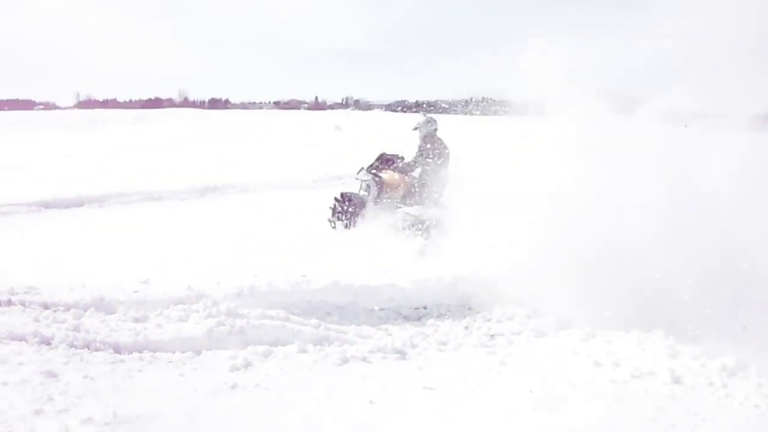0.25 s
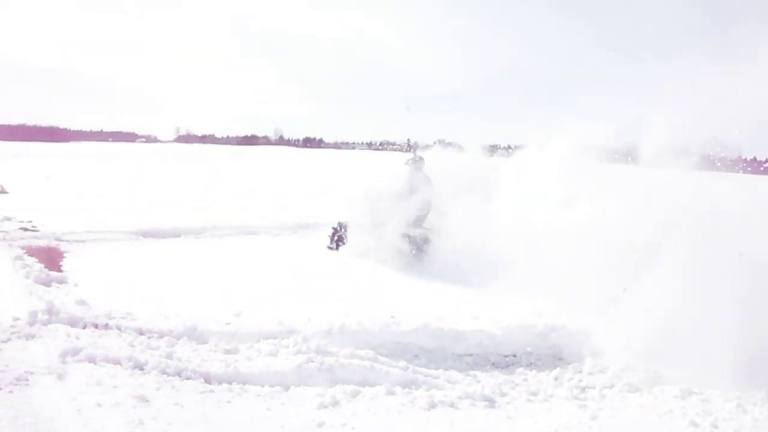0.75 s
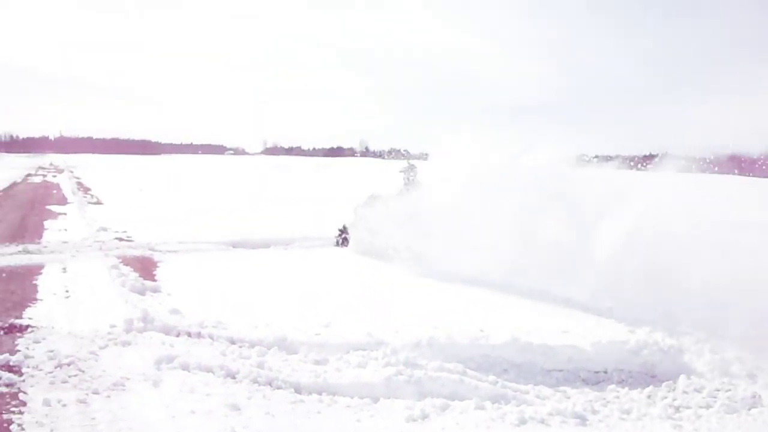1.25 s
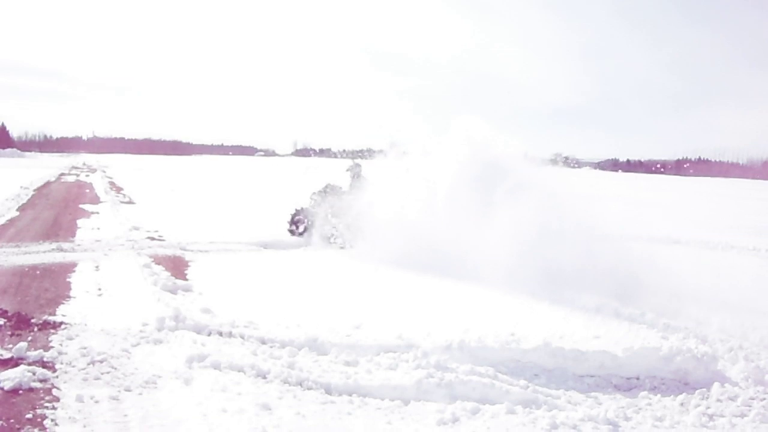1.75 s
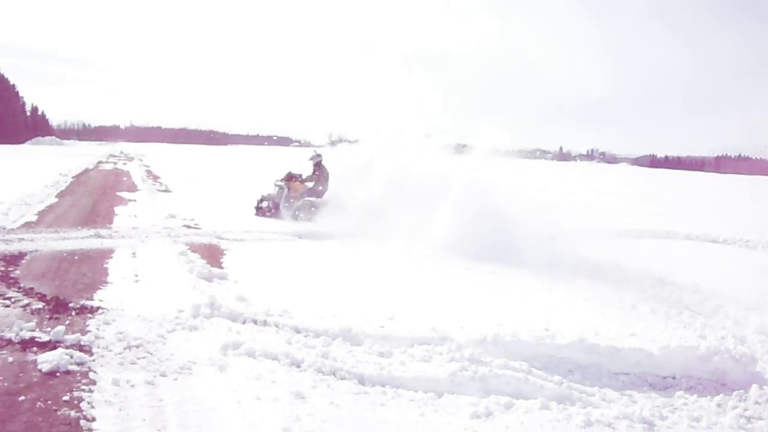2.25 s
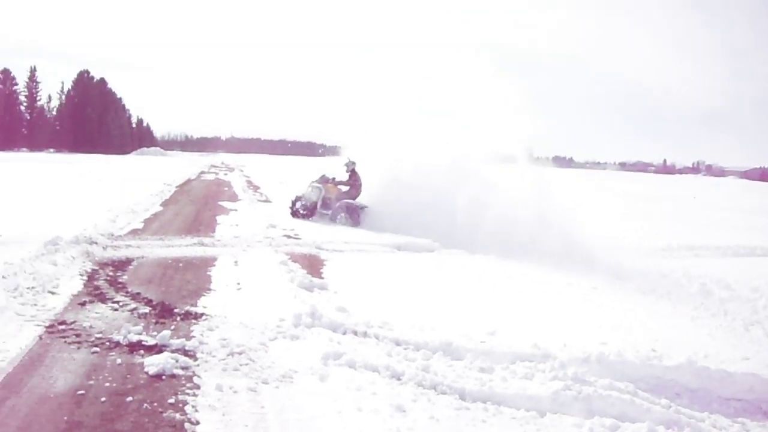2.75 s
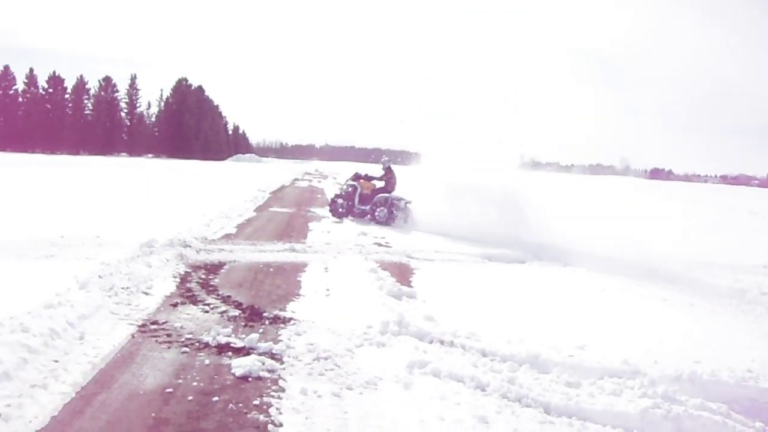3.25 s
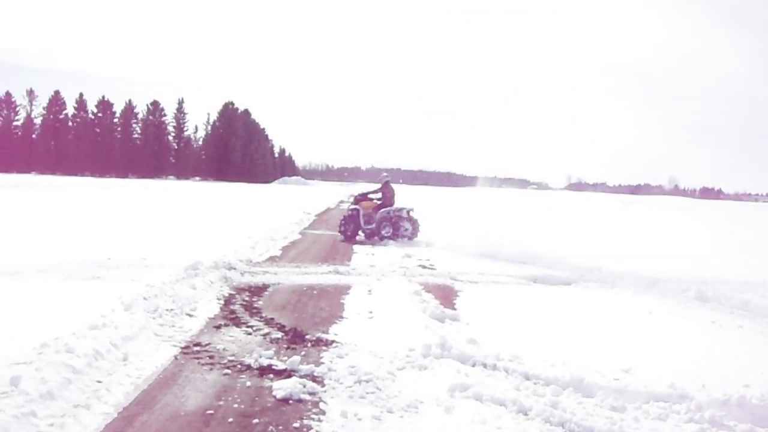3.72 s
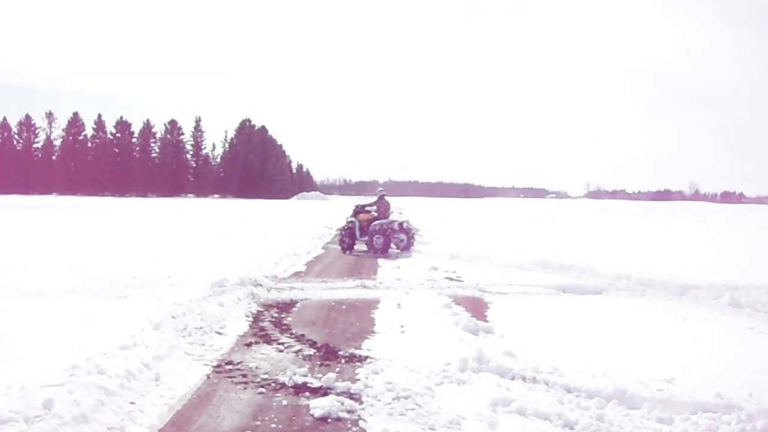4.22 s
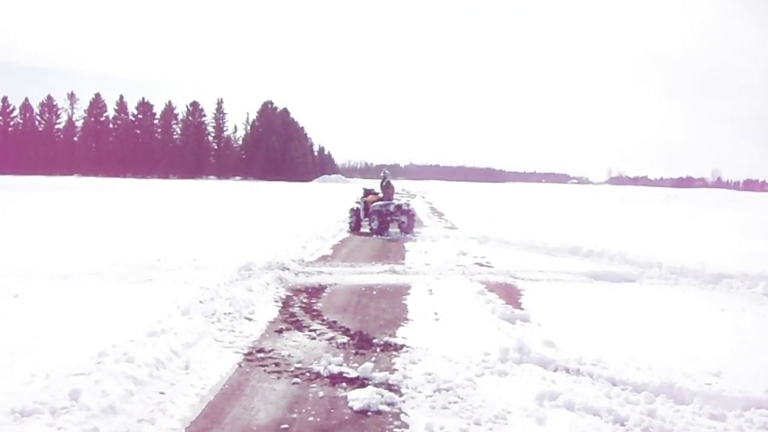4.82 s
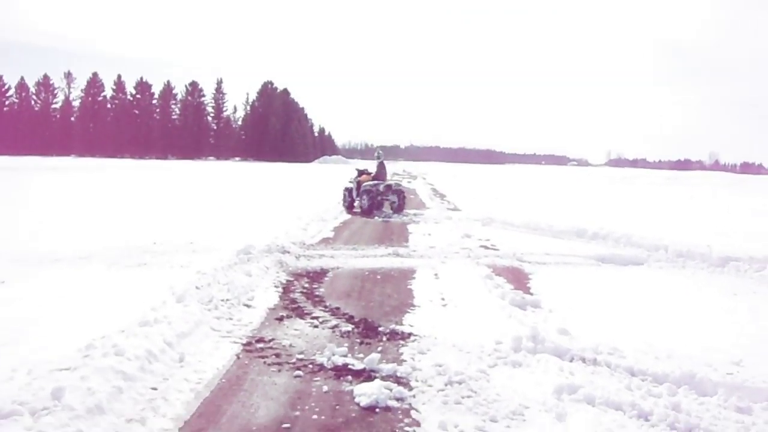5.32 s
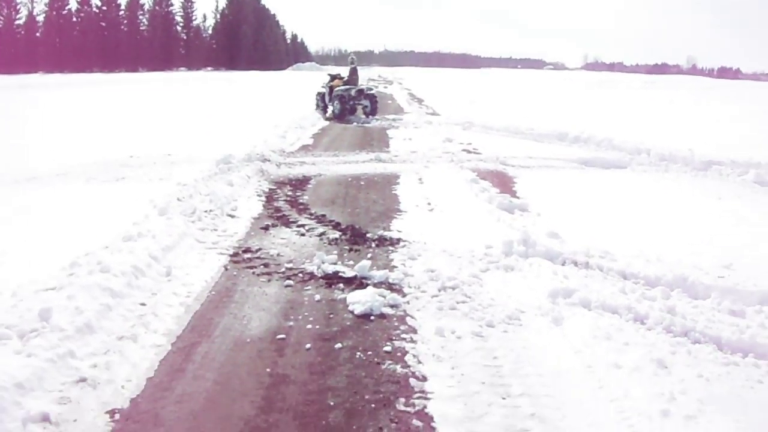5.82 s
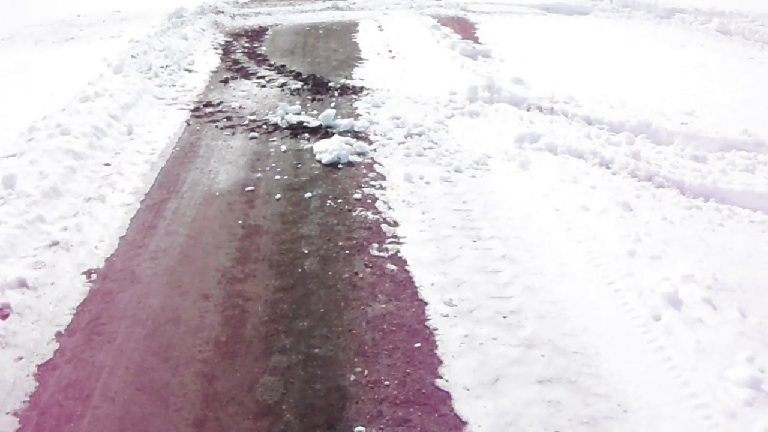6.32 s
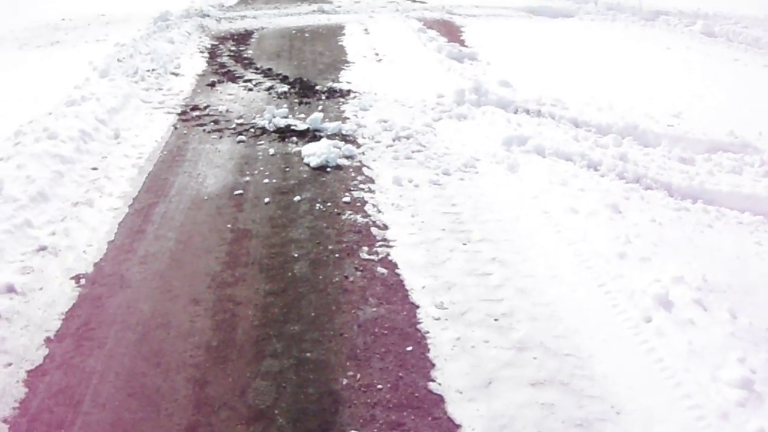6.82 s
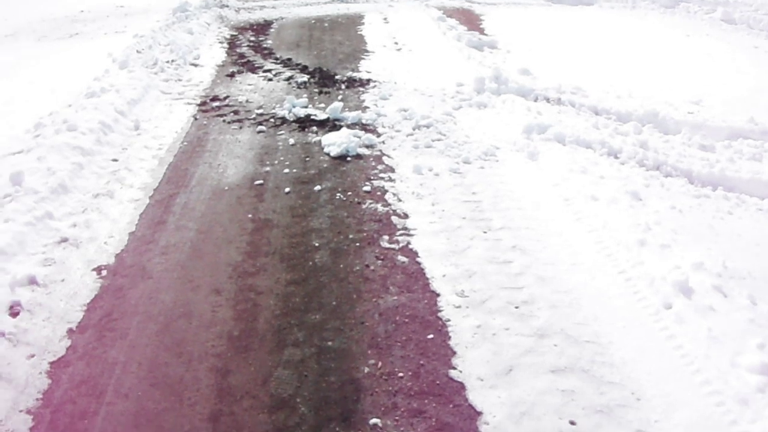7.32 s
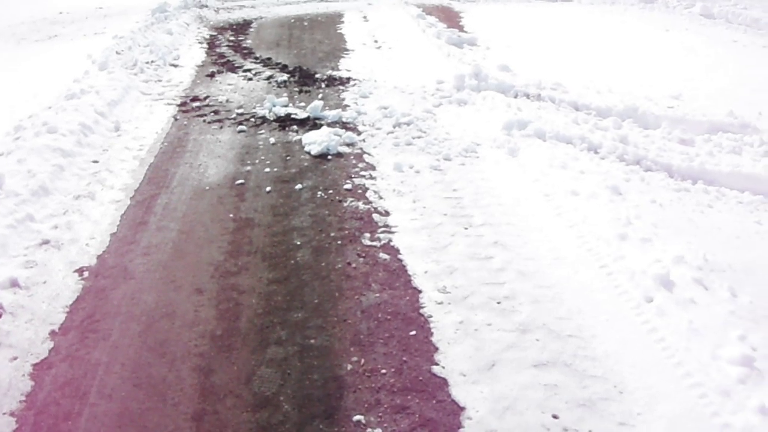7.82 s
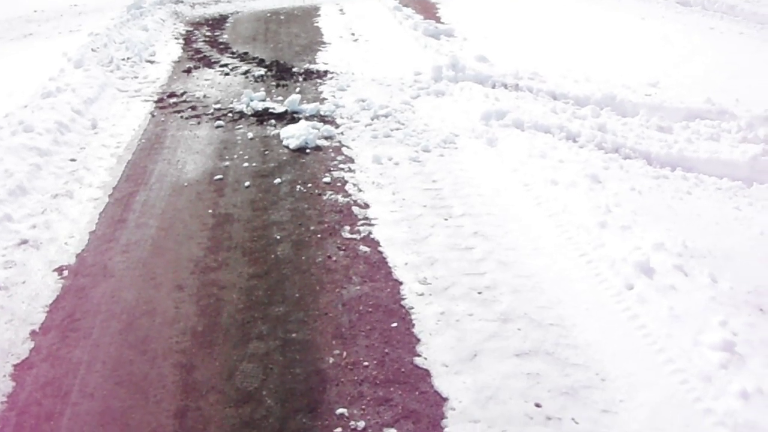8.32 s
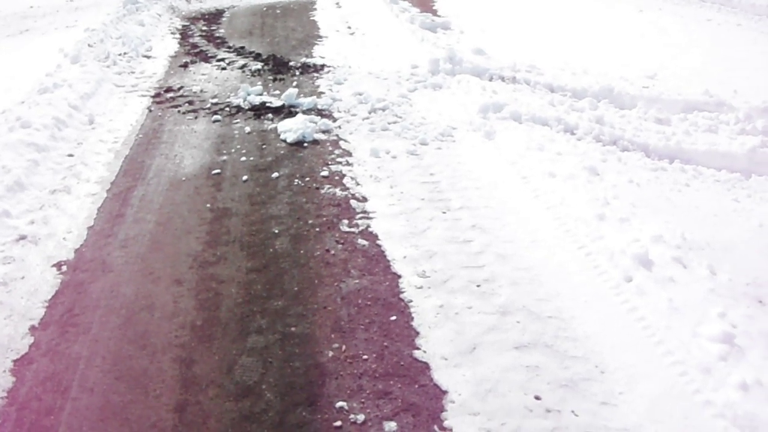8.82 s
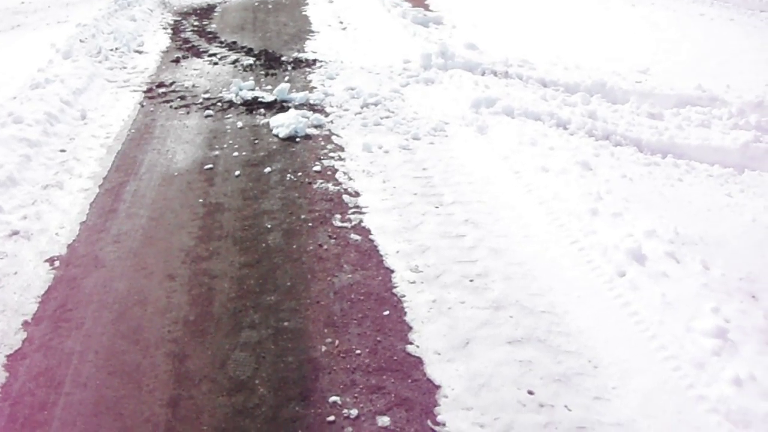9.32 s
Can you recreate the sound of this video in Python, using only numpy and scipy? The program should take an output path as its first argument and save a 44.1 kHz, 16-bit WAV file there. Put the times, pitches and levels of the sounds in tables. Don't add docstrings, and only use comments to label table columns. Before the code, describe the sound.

A quad's hard, buzzing full-throttle howl over snow spray lasts under three seconds, then collapses into a smooth run-down hum and separate thumping exhaust beats. Short throttle pulls bark out, followed by uneven idling and dry mechanical clatter. Handheld camera noises intrude very close: fabric scrapes, sharp plastic ticks, a tiny squeak and two booming blows. The idle returns clearly, then jumps up in a hard rev and a last jab. Open air, no reverberation.

```python
import sys
import numpy as np
from scipy import signal
from scipy.io import wavfile
from scipy.ndimage import uniform_filter1d

SR = 44100
rng = np.random.default_rng(int(sys.argv[2]) if len(sys.argv) > 2 else 0)


def voltage_ratio(decibels):
    exponent = np.asarray(decibels, float) / 20
    return 10 ** exponent


def dump_mix(stems):
    frames = np.atleast_2d(stems).T
    limited = np.clip(frames, -1, 1)
    pcm = np.round(limited * 32767).astype(np.int16)
    wavfile.write(sys.argv[1], SR, pcm)


N = 421591
TIME = np.arange(N) / SR


def evened(x):
    return x / np.sqrt(np.mean(x ** 2) + 1e-20)


def curves(rows, t):
    s, *columns = np.transpose(rows)
    return [np.interp(t, s, c) for c in columns]


def colour(x, points, size=2048):
    f, level_db = np.transpose(points)
    log_hz = np.log(abs(np.fft.fftfreq(size, 1 / SR)) + 1)
    log_gain = np.interp(log_hz, np.log(f), level_db) * np.log(10) / 20
    taps = np.fft.ifft(np.exp(np.conj(signal.hilbert(log_gain)))).real
    return signal.oaconvolve(x, taps / np.linalg.norm(taps))[:len(x)]


def add(mix, s, sound):
    part = mix[round(s * SR):][:len(sound)]
    part += sound[:len(part)]


def train(s, size):
    at, out = s * SR, np.zeros(N + 2)
    np.add.at(out, at.astype(int), size * (1 - at % 1))
    np.add.at(out, at.astype(int) + 1, size * (at % 1))
    return out[:N]


def bursts(s, size, fade_s):
    u = np.arange(2000) / SR / fade_s
    return signal.oaconvolve(train(s, size), u * np.exp(1 - u))[:N] * rng.standard_normal(N)


# time in seconds, gain in dB.
CAMERA_GAIN = [(2.7, -27.5), (3.1, -3), (3.79, 6), (4.0, 2), (4.25, 2), (4.34, -5), (5.34, 4.5),
               (5.93, 4.5), (6.2, -4), (6.96, -2), (7.0, -4), (7.27, -10.5), (7.9, 0), (8.3, 5),
               (8.79, 3.5), (8.91, -4.5), (9.4, -4.5), (9.46, -11)]
# frequency in Hz, level in dB.
WHINE_LINES = [(7779, -61), (7838, -50), (7897, -50), (7957, -60), (11719, -61)]
WHINE_DB = -49


def camera():
    lines = evened(sum(voltage_ratio(db) * np.sin(2 * np.pi * (hz * TIME + rng.random())) for hz, db in WHINE_LINES))
    hiss_colour = [(2000, 5.5), (6000, 6.5), (9500, -12), (12500, -18), (15800, 2), (16600, -74)]
    hiss = colour(rng.standard_normal(N), hiss_colour)
    return voltage_ratio(WHINE_DB + curves(CAMERA_GAIN, TIME)[0]) * (lines * (TIME > 2.8) + voltage_ratio(-10) * hiss)


# time in seconds, engine cycles per second.
BLAST_SPEED = [(0, 62), (.27, 62.6), (.5, 54.3), (1.02, 58.5), (1.3, 55.6), (1.56, 55.3), (1.74, 59.8),
               (1.97, 59.5), (2.3, 55.3), (2.68, 58)]
# time in seconds, cycles per second.
SETTLED_SPEED = [(2.79, 7.62), (4.79, 21.48), (5.53, 13.75), (5.53, 11.44), (6.81, 10.68), (7.38, 11.57),
                 (7.68, 9.93), (8.58, 11.08), (8.61, 10.19)]
# opening time in seconds, seconds held, cycles per second gained,
# run-down in seconds.
THROTTLE_BLIPS = [
    (3.026, .244, 10.66, .121),
    (3.643, .337, 9.75, .096),
    (4.185, .235, 14.72, .039),
    (8.79, .217, 16.54, .168),
    (9.337, .066, 11.37, .253),
]
SHUT_S, SHUT_TURN, SHUT_SPEED = 2.68, 154.63, 58.3
RUN_DOWN_S = .31
SURGE_HZ, SURGE_DEPTH, SURGE_PEAK_S = 7.7, 0.79, 1.75
REAR_LAG = .39


def spare_speed(t):
    spare = (SHUT_SPEED - curves(SETTLED_SPEED, t)[0]) * np.exp(-np.maximum(t - SHUT_S, 0) / RUN_DOWN_S)
    for start, held, gained, fall in THROTTLE_BLIPS:
        ramp = np.clip((t - start) / held, 0, 1)
        spare = spare + gained * ramp * np.exp(-np.maximum(t - start - held, 0) / fall)
    return spare


def speed(t):
    surge = SURGE_DEPTH * np.cos(2 * np.pi * SURGE_HZ * (t - SURGE_PEAK_S))
    return np.where(t < SHUT_S, curves(BLAST_SPEED, t)[0] + surge, curves(SETTLED_SPEED, t)[0] + spare_speed(t))


def firings(turns):
    cycle = np.arange(1, int(turns[-1]) + 1)
    s = np.interp(np.r_[cycle, cycle + REAR_LAG], turns, TIME)
    return s, np.r_[cycle, cycle], np.repeat([False, True], len(cycle))


# start in seconds, length in seconds, thump peak in dB,
# share of the length at which it peaks.
GAS_PUSHES = [
    (3.068, .24, -10.5, 0.24),
    (3.558, 0.13, -8.5, 0.56),
    (3.748, 0.22, -5.5, 0.55),
    (4.186, .2, -4, 0.62),
    (5.288, 0.21, -13.5, 0.24),
    (8.781, 0.24, -4, 0.55),
    (9.296, 0.13, -3, 1),
]
IDLE_DB, IDLE_SHARE, OVERRUN_DB = -10.5, 0.66, 0.6
IDLE_PUFF_DB, PUFF_SHARE, COAST_PUFF_DB = -39.5, 0.79, -33
OPEN_PUFF_DB, OPEN_SHARE = -17, 1.544
EASE_IN_DB, EASE_OUT_DB, LINGER_DB_PER_S = 6, 4.5, 153


def load(t):
    gain_db = curves(CAMERA_GAIN, t)[0]
    overrun_db = OVERRUN_DB * np.minimum(spare_speed(t), 22)
    fire_db = IDLE_DB + IDLE_SHARE * gain_db - overrun_db
    puff_db = IDLE_PUFF_DB + PUFF_SHARE * np.maximum(gain_db, -8) - 0.13 * overrun_db
    puff_db = np.where(t < GAS_PUSHES[0][0], COAST_PUFF_DB + 0.81 * gain_db, puff_db)
    opened = np.zeros(len(t), bool)
    for start, length, db, peak_at in GAS_PUSHES:
        shape = [0, np.clip(peak_at, .05, .95), 1]
        push_db = db + np.interp((t - start) / length, shape, [-EASE_IN_DB, 0, -EASE_OUT_DB])
        push_db -= LINGER_DB_PER_S * np.maximum(t - start - length, 0)
        now = (t > start) & ((t < start + length) | (push_db > fire_db))
        fire_db = np.where(now, push_db, fire_db)
        puff_db = np.where(now, OPEN_PUFF_DB + OPEN_SHARE * push_db, puff_db)
        opened |= now
    return fire_db, puff_db, opened


# frequency in Hz, level in dB.
CLATTER_COLOUR = [(200, -17.5), (320, -0.5), (600, -13.5), (850, -11.5), (1150, -18.5), (1650, -9.5),
                  (2000, -17.5), (2400, -9), (2800, -16), (3300, -21.5), (6200, -27), (9000, -23.5),
                  (12100, -32.5), (16000, -43)]
CLATTER_DB, CLATTER_SHARE, SPRAY_DB = -39, 0.96, -46
SPEED_DB = 4


def clatter(turns):
    level_db = CLATTER_DB + CLATTER_SHARE * curves(CAMERA_GAIN, TIME)[0] + SPEED_DB * np.log2(speed(TIME) / 11)
    level_db = np.where(TIME < SHUT_S, SPRAY_DB, level_db)
    throb = 1 + 0.17 * np.cos(4 * np.pi * turns)
    taps = (rng.random(N) < 300 / SR) * rng.exponential(2.0, N)
    hiss = colour(throb * rng.standard_normal(N) + taps, CLATTER_COLOUR)
    rumble_colour = [(30, -41), (55, -3.0), (130, 10.5), (280, -3.5), (500, -50.0), (1500, -51.0)]
    rumble = colour(rng.standard_normal(N), rumble_colour)
    rumble_db = uniform_filter1d(load(TIME)[0], 8000) - 22
    return voltage_ratio(level_db - 4.0) * hiss + voltage_ratio(rumble_db) * rumble * (TIME > 2.72)


# start in seconds, length in seconds, rustle level in dB.
GLOVE_STROKES = [(5.459, 0.072, -33), (5.558, 0.084, -31), (5.619, 0.11, -30.5), (5.734, 0.052, -40),
                 (5.78, 0.021, -35), (5.813, 0.034, -35.5), (5.878, 0.067, -54), (5.947, 0.083, -37),
                 (6.533, 0.069, -36.5), (6.867, 0.063, -34), (6.928, 0.063, -38.5)]
# frequency in Hz, level in dB.
RUSTLE_COLOUR = [(600, -27), (1200, -5.5), (1700, -13.5), (2200, -9.5), (3800, -17.5), (5600, -20.5),
                 (7700, -18.5), (10500, -18), (12000, -24), (13200, -36), (16000, -44)]


def glove():
    out = np.zeros(N)
    for s, length_s, db in GLOVE_STROKES:
        size = round(length_s * SR)
        grit, flicker = rng.standard_normal((2, size))
        grains = grit * voltage_ratio(3.5 * evened(uniform_filter1d(flicker, 90)))
        add(out, s, voltage_ratio(db) * evened(colour(grains, RUSTLE_COLOUR)) * signal.windows.tukey(size, .6))
    return out


# time in seconds, peak in dB, ring in Hz, 60 dB decay in seconds.
SHARP_TICKS = [(3.331, -18, 1900, .01), (4.429, -22.5, 2400, 0.0093), (5.2427, -24, 7500, 0.015),
               (5.5144, -32, 7830, 0.0089), (5.5543, -26, 7870, 0.012), (5.564, -23, 7850, 0.01),
               (5.9514, -2.5, 8700, 0.0032), (5.9858, -14.5, 7900, 0.0053), (6.008, -17, 8460, 0.0074),
               (6.015, -13.5, 8100, 0.011), (6.026, -18, 2460, 0.008), (6.1577, -18.5, 3700, 0.011),
               (6.1685, -7.5, 7940, 0.0093), (6.336, -31, 2270, 0.012), (6.501, -28, 3610, 0.013),
               (6.531, -9, 10200, 0.0031), (6.5382, -7, 4480, 0.012), (6.5453, -13, 4200, 0.014),
               (6.551, -8, 4500, 0.007), (6.557, -1.5, 8700, 0.0044), (6.56, -11.5, 10500, 0.0097),
               (6.883, -15.5, 2480, 0.019), (6.9061, -11, 2630, 0.017), (7.16, -31, 2460, 0.012),
               (7.2021, -12.5, 1970, 0.0071), (7.239, -29, 3290, 0.015), (9.387, -18, 6100, .008)]


def sharp_ticks():
    out = np.zeros(N)
    t = np.arange(3000) / SR
    for s, db, hz, t60 in SHARP_TICKS:
        band = [.5 * hz / SR * 2, min(2.13 * hz / SR * 2, .62)]
        wide = signal.lfilter(*signal.butter(2, band, "bandpass"), rng.standard_normal(len(t)))
        fade = voltage_ratio(db - 1.5 - 60 * t / max(t60, .002)) * np.minimum(t / 0.0002, 1)
        add(out, s, fade * (evened(wide) + 1.08 * np.sin(2 * np.pi * hz * t)))
    return out


# time in seconds, peak in dB, push (+) or pull (-) factor.
CASE_BLOWS = [
    (6.541, -11.5, 0.53),
    (6.907, -12, -0.88),
    (6.9723, 8.5, -1.76),
    (7.2087, 13, 0.49),
]
# frequency in Hz, level in dB, 60 dB decay in seconds.
CASE_MODES = [(128, -54, 0.023), (493, 8, 0.0067), (838, 3.5, 0.014), (1060, 5, 0.017), (1452, 5.5, 0.017),
              (1835, -2, 0.021), (2200, -0.5, 0.02), (2533, 10, 0.011), (3350, -7, 0.019)]


def case_blows():
    out = np.zeros(N)
    t = np.arange(3000) / SR
    for s, db, sense in CASE_BLOWS:
        ring = np.zeros(len(t))
        for hz, mode_db, t60 in CASE_MODES:
            ring += voltage_ratio(mode_db - 60 * t / t60) * np.sin(2 * np.pi * hz * rng.uniform(0.826, 1.069) * t)
        contact = 1.1 * rng.standard_normal(len(t)) * voltage_ratio(-60 * t / .006)
        add(out, s, sense * voltage_ratio(db - 6) * (ring + contact))
    return out


# time in seconds, pitch in Hz, level in dB.
SQUEAK_GLIDE = [(6.94, 4600, -47.5), (6.953, 4650, -30), (6.967, 4660, -27), (6.99, 4450, -34),
                (7.02, 4440, -49)]


def squeak():
    hz, db = curves(SQUEAK_GLIDE, TIME)
    waver = .4 + evened(uniform_filter1d(rng.standard_normal(N), 70))
    on = (TIME > SQUEAK_GLIDE[0][0]) & (TIME < SQUEAK_GLIDE[-1][0])
    return voltage_ratio(db) * waver * on * np.sin(2 * np.pi * np.cumsum(hz) / SR)


def orders(table, turns):
    return evened(sum(-voltage_ratio(db) * np.cos(2 * np.pi * k * (turns - REAR_LAG) - 0.61 * k) for k, db in table))


# multiple of the engine cycle, level in dB.
COAST_ORDERS = [(2, -7.5), (3, -6.5), (5, -16), (7, -24.5), (8, -30)]
COAST_DB, COAST_RISE_S, COAST_END_S, COAST_FALL_DB = -26.5, 0.25, 3.45, 280


def coast(turns):
    rise_db = -22 * np.maximum(1 - (TIME - SHUT_S) / COAST_RISE_S, 0)
    fall_db = -COAST_FALL_DB * np.maximum(TIME - COAST_END_S, 0)
    return voltage_ratio(COAST_DB + rise_db + fall_db) * orders(COAST_ORDERS, turns)


def thump(width_s, lead, loss, chambers):
    t = np.arange(-400, 5000) / SR
    out = np.zeros(len(t))
    for trip in range(5):
        u = (t - 0.01633 * trip) / (width_s * 1.18 ** trip)
        out += loss ** trip * (1 - u ** 2 + lead * u) * np.exp(-u ** 2 / 2)
    for hz, db, t60 in chambers:
        out += (t > 0) * voltage_ratio(db - 60 * t / t60) * np.sin(2 * np.pi * hz * t)
    return out


def huff():
    u = np.maximum(np.arange(-400, 5000) / SR / .014, 0)
    ring = np.sin(2 * np.pi * 135 * 0.01427 * u) + 0.32 * np.sin(2 * np.pi * 255 * .014 * u)
    return u * np.exp(1 - u) * ring


LIMP_SPAN = (4.5, 8.7)
LIMP_SLIPS = [5.2, 7.66, 7.86, 8.25, 8.35, 8.43]
# time in seconds, dB against the thump.
AIRBOX_FACING = [(3.3, -32), (4.2, -15), (4.45, -9.5), (5.3, -10), (5.5, -19), (8.8, -21), (9.0, -3),
                 (9.2, -15.5)]
# frequency in Hz, level in dB.
PUFF_COLOUR = [(240, -16.5), (400, -12), (452, 0.5), (502, -9.5), (670, -0.5), (994, -14), (1800, -5.5),
               (2470, -6.5), (5430, -24.5), (6040, -38), (7930, -24), (9090, -32), (15000, -57)]
MISS_DB, CATCH_DB, RELIEF_DB, RICH_DB = -14, 1, 1, 0.5
HUFF_DB, FRONT_PUFF_DB = -13.5, 1.5
IN_GEAR_END_S = 5.49


def chug(s, cycle, rear):
    level_db, puff_db, opened = load(s)
    cycle_s = np.where(rear, s, np.roll(s, len(s) // 2))
    limping = (cycle_s > LIMP_SPAN[0]) & (cycle_s < LIMP_SPAN[1]) & ~opened
    missed = limping & ((cycle + np.searchsorted(LIMP_SLIPS, cycle_s)) % 2 == 1)
    front_db = level_db + RELIEF_DB * limping * np.where(missed, 1, -1)
    rear_db = level_db + np.where(missed, MISS_DB, CATCH_DB * limping)
    fire_db = np.where(rear, rear_db, front_db)
    puff_db = puff_db + RICH_DB * limping * np.where(missed, -1, 1)
    chance = rng.standard_normal((len(s), 2))
    size = (s > GAS_PUSHES[0][0]) * voltage_ratio(fire_db + 1.2 * chance[:, 0])
    tight = np.clip((puff_db + 30.5) / 9, 0, 1) * opened
    in_gear = s < IN_GEAR_END_S

    soft = thump(0.0017, 0.15, 0.42, [(62.0, -19, 0.042), (135.8, -2.5, 0.035), (314, -22, 0.017)])
    hard = thump(.0011, 1.5, .2, [(95, -16, .04), (140, -14, .06), (290, -16, .04), (450, -22, .03)])
    rolling = thump(.0016, 0.79, 0.49, [(95, -15, .05), (147, -7.5, 0.044), (192, -15.5, .04)])
    box = thump(0.00054, 0.82, 0.058, [(290.8, -3.5, 0.17), (436, -11.5, 0.048), (618, -22.5, 0.29)])
    huff_size = (missed & rear) * voltage_ratio(level_db + HUFF_DB + 2.5 * chance[:, 0])
    box_size = np.minimum(size, .25) * voltage_ratio(curves(AIRBOX_FACING, s)[0])
    low = signal.oaconvolve(train(s, size * (1 - tight) * ~in_gear), soft)
    low += signal.oaconvolve(train(s, size * tight), hard)
    low += signal.oaconvolve(train(s, voltage_ratio(-3.5) * size * (1 - tight) * in_gear), rolling)
    low += signal.oaconvolve(train(s, huff_size), huff())
    low += signal.oaconvolve(train(s, box_size), box)

    misfire_db = 0.78 * (fire_db - np.maximum(front_db, rear_db))
    bark_db = FRONT_PUFF_DB * opened * np.where(rear, -1, 1)
    uneven_db = np.where(opened, .8, 2.65) * chance[:, 1]
    puff = (s > 2.74) * voltage_ratio(puff_db + misfire_db + bark_db + uneven_db)
    gas = bursts(s - .0025, puff, 0.0026)
    gas += 1.14 * bursts(s + 0.0138, puff * ~opened, 0.00063)
    gas -= 12 * train(s - .002, puff * tight)
    return low[400:N + 400] + voltage_ratio(4.5) * colour(gas, PUFF_COLOUR)


# time in seconds, crack level in dB.
PIPE_AIM = [(0, -23), (.54, -28.5), (.92, -22), (1.25, -28.5), (1.69, -22.5), (2.11, -26), (2.33, -25),
            (2.43, -23.5), (2.68, -24.5)]
# multiple of the engine cycle, level in dB.
BOOM_ORDERS = [(1, 2), (2, -7), (3, -5), (4, -6.5), (5, -6), (6, -6), (7, -12.5), (8, -7), (9, -10)]
BOOM_DB, BOOM_SHARE = -31, 0.17


def boom(turns):
    level_db = BOOM_DB + BOOM_SHARE * (curves(PIPE_AIM, TIME)[0] + 26)
    return voltage_ratio(level_db - 500 * np.maximum(TIME - SHUT_S, 0)) * orders(BOOM_ORDERS, turns)


# frequency in Hz, level in dB.
CRACK_COLOUR = [(120, -10), (300, -8), (450, -12.5), (570, -3), (690, 0.5), (830, -5.5), (1000, -12.5),
                (1400, 1), (1650, -4), (1900, 0), (2400, -3.5), (3300, -10.5), (5300, -44), (7000, -66)]
# frequency in Hz, level in dB.
JET_COLOUR = [(700, -16.5), (1500, -4), (2400, -6), (3500, -10.5), (5300, -15.5), (6300, -26),
              (7600, -18.5), (9000, -28), (11000, -26.5), (13000, -47)]


def scream(s, rear):
    chance = rng.standard_normal((len(s), 3))
    crack_db = curves(PIPE_AIM, s)[0] - 450 * np.maximum(s - SHUT_S, 0)
    size = voltage_ratio(crack_db - 8 * ~rear + 1.1 * chance[:, 0])
    shock = -train(s, size)
    shock -= train(s + .0013 + .00004 * chance[:, 1], size * np.where(rear, .25, .9))
    shock -= train(s + .0033 + .00012 * chance[:, 2], size * np.where(rear, .1, .4))
    jet = voltage_ratio(-.5) * colour(bursts(s, size, .0011), JET_COLOUR)
    return voltage_ratio(25.5) * colour(shock, CRACK_COLOUR) + jet


def scene():
    turns = np.cumsum(speed(TIME)) / SR
    turns += SHUT_TURN - np.interp(SHUT_S, TIME, turns)
    s, cycle, rear = firings(turns)
    hands = glove() + sharp_ticks() + case_blows() + squeak()
    engine = coast(turns) + chug(s, cycle, rear) + boom(turns) + scream(s, rear)
    return (camera() + clatter(turns) + hands + engine)[None]


def band_limit(x):
    return signal.sosfilt(signal.butter(12, 16150, fs=SR, output="sos"), x)


def record(dry):
    cut = signal.sosfiltfilt(signal.butter(2, 38 / SR * 2, "highpass", output="sos"), dry)
    cut = signal.oaconvolve(cut, signal.firwin(255, 16000, fs=SR)[None], "same")
    return band_limit(np.clip(cut, -.95, .95))


dry = scene()
out = record(dry)
dump_mix(out)
```